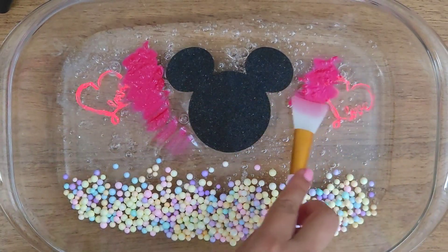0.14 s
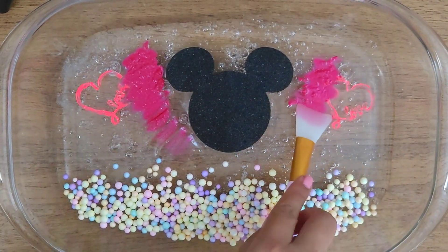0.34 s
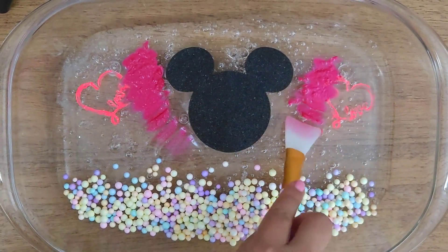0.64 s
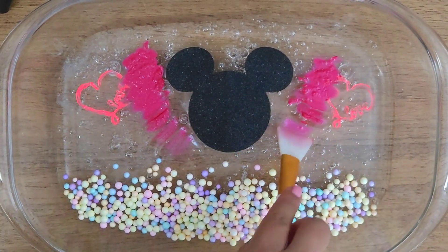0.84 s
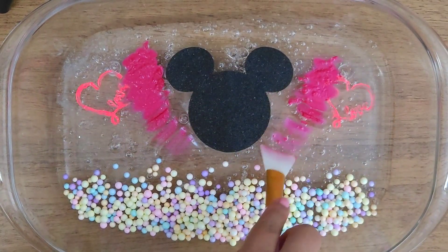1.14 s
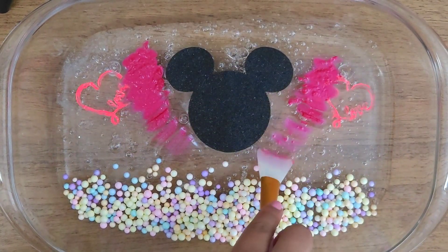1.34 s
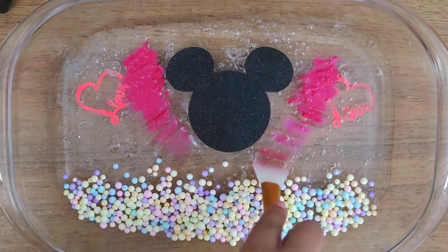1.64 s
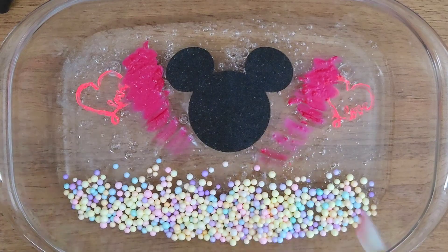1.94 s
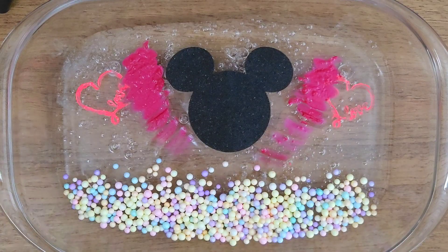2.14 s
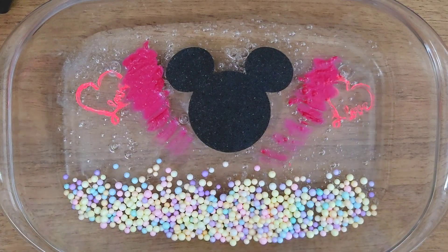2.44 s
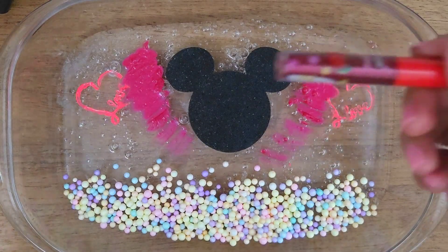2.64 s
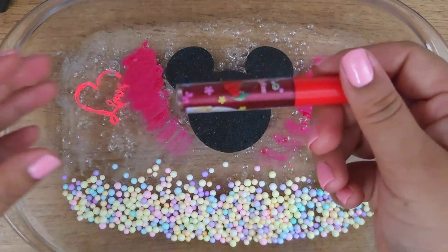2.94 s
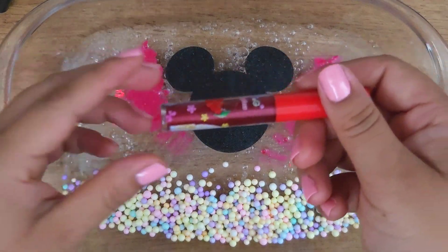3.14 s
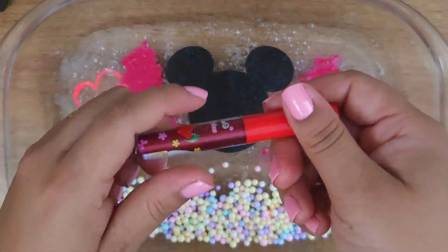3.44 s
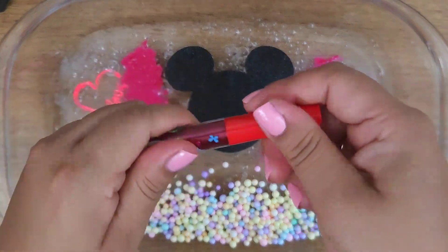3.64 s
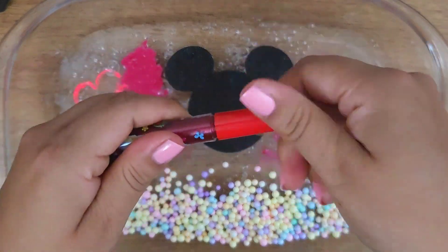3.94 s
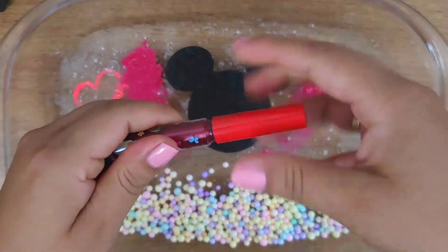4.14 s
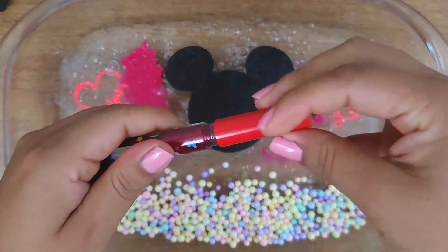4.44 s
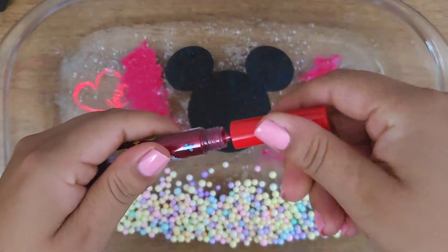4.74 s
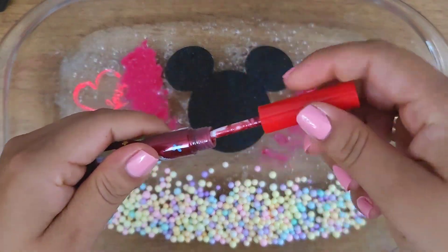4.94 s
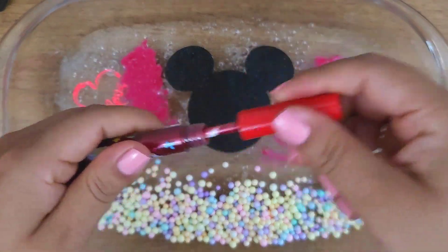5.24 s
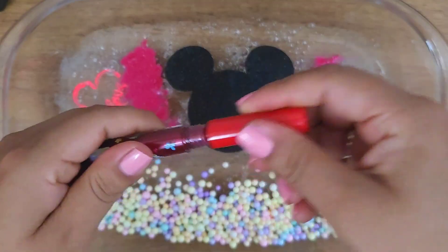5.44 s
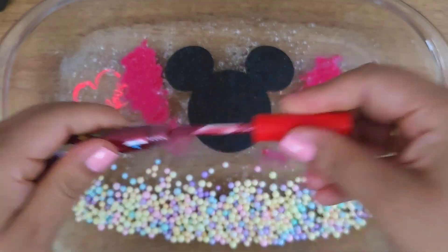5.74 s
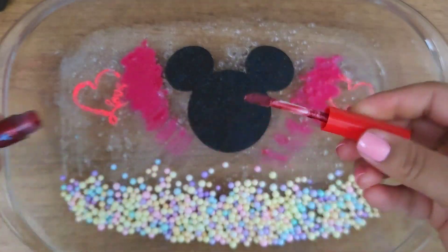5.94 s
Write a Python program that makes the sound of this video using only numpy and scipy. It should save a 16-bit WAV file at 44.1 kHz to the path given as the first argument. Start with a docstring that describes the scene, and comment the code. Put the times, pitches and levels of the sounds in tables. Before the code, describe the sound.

Close, quiet slime peeling and soft low thuds, a brief hand swish, then light plastic ticks growing into loud snappy clacks as a wand slides out.

```python
"""A soft brush dabs sticky slime in a glass dish: filtered crackling noise peels, short pitched bursts snap.
Each dab thumps the table, noise and a knock ringing its modes; then a hand swishes and drags, banded noise.
Close by, fingers twist open a small plastic tube: noise rubs in the thread, short rattles ring the plastic,
brief noisy tones squeak, and the walls answer with decaying noise.
Under it all lies a quiet room: a machine drone, a low swelling rumble and faint air, all shaped noise."""
import sys
import numpy as np
from scipy import signal
from scipy.fft import rfft, irfft, next_fast_len
from scipy.io import wavfile
from scipy.ndimage import map_coordinates

SR = 44100
rng = np.random.default_rng(int(sys.argv[2]) if len(sys.argv) > 2 else 0)


def natural_amplitude(level_db):
    """Convert a level in decibels to a linear amplitude factor, elementwise."""
    exponent = np.asarray(level_db, float) / 20
    return 10 ** exponent


def log_audio(samples):
    """Write samples as a 16-bit WAV file to the path given in sys.argv[1]."""
    # one column per channel
    frames = np.atleast_2d(samples).T
    # limit to full scale, then quantise
    limited = np.clip(frames, -1, 1)
    pcm = np.round(limited * 32767).astype(np.int16)
    wavfile.write(sys.argv[1], SR, pcm)


N = 268613
LEFT_RIGHT = np.array([[1], [-1]])  # opposite signs for the two channels


def unit(x):
    """Scale to rms 1."""
    return x / np.sqrt(np.mean(x ** 2) + 1e-20)


def along(points, hz):
    """Read (Hz, value) points on a log frequency axis."""
    f, value = np.transpose(points)
    return np.interp(np.log(hz + 1), np.log(f + 1), value)


def curves(rows):
    """One value per sample for each column after the time."""
    s, *columns = np.transpose(rows)
    return [np.interp(np.arange(N) / SR, s, column) for column in columns]


def stroke_db(full_s, db, rise_s, hold_s, fade_db_per_s=900):
    """Level of one stroke: climbs 25.5 dB over its rise, holds, then fades."""
    t = np.arange(N) / SR - full_s
    return db - 25.5 * np.maximum(-t, 0) / rise_s - fade_db_per_s * np.maximum(t - hold_s, 0)


def strokes(rows):
    """Gains of the main band and of the fine hiss above it, summed over all strokes."""
    main = natural_amplitude([stroke_db(*row[:4]) for row in rows])
    return main.sum(0), natural_amplitude([row[-1] for row in rows]) @ main


def wobble(rate):
    """A smooth random curve, rate knots a second."""
    return map_coordinates(rng.standard_normal(N // 8), [np.arange(N) * rate / SR])


def crackle(spiky_db):
    """Noise whose size jumps from one millisecond to the next."""
    return rng.standard_normal(N) * natural_amplitude(spiky_db * wobble(700))


def filtered(x, response):
    """Multiply the spectrum of x by a complex response of frequency."""
    m = next_fast_len(x.shape[-1] + 8192)
    return irfft(rfft(x, m) * response(np.fft.rfftfreq(m, 1 / SR)), m)[..., :x.shape[-1]]


def resonances(modes, f):
    """Causal sum of (Hz, width Hz, dB) resonances of alternating sign."""
    total = 0
    for k, (center, width, db) in enumerate(modes):
        damping = 1j * f * width
        total = total + (-1) ** k * natural_amplitude(db) * damping / (center * center - f * f + damping)
    return total


def rush(spectrum, alike):
    """Stereo noise of rms 1, with a spectrum and a left-right likeness over frequency."""
    def response(hz):
        turn = np.arccos(np.clip(along(alike, hz), 0, 1)) / 2
        return natural_amplitude(along(spectrum, hz)) * [np.cos(turn), np.sin(turn)]

    mid, side = filtered(rng.standard_normal((2, N)), response)
    return unit(np.array([mid + side, mid - side]))


def add(out, s, db, shape):
    """Mix in a short sound at a time and peak level, taken on its first row."""
    start = round(s * SR)
    peak = np.abs(np.atleast_2d(shape)[0]).max()
    out[..., start:start + shape.shape[-1]] += natural_amplitude(db) * shape / peak


# swells of the rumble: time_s, level_db
RUMBLE_SWELLS = [(0.0, -50.5), (0.12, -62.5), (0.29, -52.5), (0.63, -63), (0.83, -57.5), (1.97, -57),
                 (2.15, -61.5), (2.42, -60.5), (2.53, -70.5), (2.73, -65), (2.88, -58.5), (3.14, -60.5),
                 (3.48, -61.5), (3.73, -63), (4.07, -60), (4.31, -62), (4.55, -59.5), (5.3, -57.5),
                 (6.09, -60.5)]
# color of the rumble: pitch_hz, relative density_db per Hz
RUMBLE_COLOR = [(8, -23), (20, -4.5), (30, -4.5), (45, -4), (60, 4), (108, -6), (139, -7), (200, -15.5),
                (240, -36), (500, -76)]
# color of the air: pitch_hz, relative density_db per Hz
AIR_COLOR = [(120, -29), (200, -8), (240, -5.5), (529, -9.5), (612, -17.5), (696, -15.5), (950, -20),
             (1180, -15.5), (2420, -30), (2800, -28), (3070, -31), (6280, -42), (7270, -37), (14600, -47.5),
             (16000, -49)]
# likeness of left and right: pitch_hz, likeness (below 0 counts as 0, 1 is identical)
LIKENESS = [(60, 1), (180, 0.4), (550, 0.37), (1650, -0.12), (4970, 0), (15000, 0.5)]
# machine drone modes, run through twice: pitch_hz, width_hz, level_db of one pass
DRONE_MODES = [(55.43, 7, -3.5), (89.36, 7.1, -4.5), (118.8, 2.2, -1.5), (145, 12, -11.5), (182, 2.1, -9)]


def room_tone():
    """Far machinery: a wavering drone over swelling rumble, and air that follows the swells a little."""
    rumble_db, = curves(RUMBLE_SWELLS)
    swell_db = rumble_db - rumble_db.mean()
    drone = unit(filtered(rng.standard_normal(N), lambda f: resonances(DRONE_MODES, f) ** 2))
    drone = natural_amplitude(-55 + 0.5 * swell_db) * drone
    rumble = natural_amplitude(rumble_db + 1.8 * wobble(7.7)) * rush(RUMBLE_COLOR, LIKENESS)
    air = natural_amplitude(-69 + 0.45 * swell_db + 0.64 * wobble(16.0)) * rush(AIR_COLOR, LIKENESS)
    return drone + rumble + air


# bristles peeling off the slime: full_s, level_db, rise_s, hold_s, fizz_db over the level
PEELS = [(0.044, -89, 0.017, .002, 5), (0.222, -63, 0.0069, 0.037, -6), (0.28, -63.5, .04, 0.0098, -17.5),
         (0.31, -80, .04, .02, -9), (0.454, -80, .024, .004, -16), (0.542, -78.5, 0.097, 0.0035, -5),
         (0.888, -72, 0.023, 0.0015, 4.5), (1.132, -64.5, 0.025, 0.0014, 2.5),
         (1.408, -69.5, .03, 0.019, -6), (1.548, -82, 0.043, .002, 10.5), (1.734, -77, 0.16, 0.0085, -2)]
# modes of the wet film: pitch_hz, width_hz, relative level_db
FILM_MODES = [(2400, 930, -16.5), (4000, 910, -10.5), (5270, 250, 1), (7200, 950, -9)]
# sticky snaps of the film: start_s, peak_db of ring and of tick, pitch_hz
SNAPS = [(0.04, -66.5, 2060), (0.038, -65, 13500), (0.233, -63.5, 1076), (0.275, -67, 1100),
         (0.447, -63, 1100), (0.45, -68.5, 6600), (0.532, -71, 3380), (0.811, -63.5, 1003),
         (0.862, -64, 1080), (0.855, -68, 8400), (0.886, -63, 1100), (0.888, -67.5, 2400),
         (0.887, -57.5, 10500), (1.128, -60.5, 6100), (1.194, -60.5, 10500), (1.339, -71, 3200),
         (1.412, -70, 2040), (1.467, -73, 3600), (1.545, -64.5, 11000), (1.757, -72.5, 3630)]


def brush():
    """The film tears in dense tiny grains and now and then snaps at one pitch, with a broad tick."""
    film, fizz = strokes(PEELS)
    grains = natural_amplitude(2.0 * wobble(200)) * crackle(spiky_db=1.5)
    wet = unit(filtered(grains, lambda f: resonances(FILM_MODES, f)))
    fine_grains = crackle(spiky_db=3)
    fine = unit(filtered(fine_grains, lambda f: resonances([(12800, 6700, 0)], f) ** 2))
    out = np.pad(film * wet + fizz * fine, (0, SR))
    t = np.arange(SR // 20) / SR
    for s, db, hz in SNAPS:
        burst = rng.standard_normal(len(t)) * natural_amplitude(-60 * t / 0.035)
        ring = filtered(burst, lambda f: resonances([(hz, 0.069 * hz, 0)], f) ** 2)
        tick = filtered(burst * natural_amplitude(-60 * t / 0.022), lambda f: resonances([(7000, 9000, 0)], f))
        add(out, s, db, ring)
        add(out, s, db, tick)
    return out[:N]


# pushes on the table: start_s, thump peak_db, firmness_db per octave, knock drive_db
PUSHES = [(0.078, -48, 6.5, 23.5), (0.261, -36.5, 3.5, 26.5), (0.345, -41, -14, 24), (0.437, -48, -6, 23),
          (0.881, -39, 1, 22), (1.052, -35.5, 5.5, 26.5), (1.184, -35.5, -2, 24), (1.322, -34.5, 3.3, 28),
          (1.459, -35.5, 1, 28.5), (1.565, -34.5, 2.7, 26), (1.746, -36, 0.5, 22.5), (3.85, -53, -4, 29),
          (5.358, -40.5, 9, 31), (5.46, -52.5, 4, 19), (5.678, -40, 8.5, 31), (5.836, -35, 5, 36)]
# table top modes: pitch_hz, width_hz, level_db before the firmness tilt
TABLE_MODES = [(70, 7.4, 1), (87, 12, 2), (124.6, 17, 2.5), (157, 28.8, -3), (192, 14, -3),
               (321, 29, -11.5), (556, 510, -21.5), (800, 190, -15.5), (1100, 300, -29)]
# the slime-filled dish: pitch_hz, width_hz, relative level_db
DISH_MODES = [(650, 320, 2.5), (1150, 270, 1.5), (2600, 540, -15)]


def table():
    """Each soft push knocks the table top and shakes it while the hand stays down; a firmer one favors
    higher modes and the dish."""
    press_s, slap_db, dish_db = 0.06, -13.5, -27
    out, t = np.zeros(N + SR), np.arange(SR // 2) / SR
    for s, db, firm_db, knock_db in PUSHES:
        knock = natural_amplitude(knock_db) * np.exp(-((t - .004) / 0.0012) ** 2)
        tremble = rng.standard_normal(len(t)) / (1 + (t / press_s) ** 8)
        tremble = natural_amplitude(32) * filtered(tremble, lambda f: 1 / (1 + 1j * f / 330) ** 4)
        # the soft contact lands bit by bit
        slap = natural_amplitude(knock_db + slap_db) * rng.standard_normal(len(t)) * t / 0.01 * np.exp(-t / 0.011)
        modes = [(hz, width, mode_db + firm_db * np.log2(hz)) for hz, width, mode_db in TABLE_MODES]
        # the soft contact also dulls the top
        thump = filtered(knock + slap + tremble, lambda f: resonances(modes, f) / (1 + 1j * f / 1300) ** 2)
        dish = filtered(slap, lambda f: resonances(DISH_MODES, f))
        add(out, s, db, thump)
        add(out, s + .004, db + dish_db + 0.71 * firm_db, dish)
    return out[:N]


# a hand moving off over the table: full_s, level_db, rise_s, hold_s
SWISHES = [(2.14, -68, 0.11, 0.0078), (2.29, -63.5, 0.19, 0.048), (2.4, -68, 0.16, 0.041)]
# modes of the swish: pitch_hz, width_hz, relative level_db
SLEEVE_MODES = [(316, 23, 5), (512, 46, -2.5), (712, 61, -7)]
# the sleeve drags on the table: full_s, level_db, rise_s, hold_s
DRAGS = [(2.392, -57.5, 0.14, 0.05)]


def hand():
    """The moving hand and sleeve swish softly and low; a short drag stirs one table mode."""
    moves = sum(natural_amplitude(stroke_db(*row, fade_db_per_s=400)) for row in SWISHES)
    drags = sum(natural_amplitude(stroke_db(*row, fade_db_per_s=400)) for row in DRAGS)
    noise = rng.standard_normal((2, N)) + rng.standard_normal(N)  # half shared by left and right
    swish = unit(filtered(noise, lambda f: resonances(SLEEVE_MODES, f)))
    drag = unit(filtered(rng.standard_normal(N), lambda f: resonances([(189, 20.5, 0)], f) ** 2))
    return moves * swish + drags * drag


# fingers turning the cap and sliding the wand: full_s, level_db, rise_s, hold_s, skin hiss_db over the level
TWISTS = [(3.845, -63.5, 0.042, 0.0042, 0), (4.17, -72, 0.081, 0.0012, 0.5), (4.408, -81, 0.061, 0.06, 3.5),
          (4.574, -72.5, 0.016, 0.0036, -1)]
# tube contacts: start_s, peak_db at the spot struck, spot (0 barrel, 1 wall, 2 neck, 3 stem),
# loss_db per part away from the spot (its sign is ignored), edge_db over the peak
CLICKS = [(3.67, -57, .7, 10, -7.5), (3.844, -52.5, 0.66, 3, 1.5), (3.95, -68.5, .05, 12, -19),
          (4.162, -51, 1.05, 4, -1.5), (4.34, -59, 0.05, 30, -19), (4.578, -43.5, 0.11, 21, -26),
          (4.889, -82, 0.1, 9, 10), (4.981, -53.5, 0.045, 28, -5), (5.032, -47.5, 3.6, 4, -13.5),
          (5.042, -57.5, 2.2, -17, 7.5), (5.062, -48.5, 3.7, 1, 1.8), (5.069, -56, 2.7, 8, -6.5),
          (5.133, -51, 2.95, 35, 2.5), (5.161, -48.5, 2.95, 10, -6.5), (5.198, -39.5, 2.1, 2.5, -2.5),
          (5.218, -33.5, 2, 4.5, -5.5), (5.226, -34.5, .6, 1, -16.5), (5.231, -33, 1.8, 12, -4),
          (5.337, -41, .4, -0.5, 2), (5.341, -39.5, 2.05, 4.5, -9.5), (5.368, -28.5, 0.05, 0, -12.5),
          (5.372, -37.5, 0.1, 8.5, 6.5), (5.385, -41, 2.9, 5.5, -10.5), (5.422, -46, 0.05, 6.5, 5.5),
          (5.4486, -23, 1.1, 0.6, -7.5), (5.4526, -9.5, 0.75, 10, -10), (5.638, -46, 0.15, 4, 4),
          (5.6688, -27, 0.092, 5, -9.5), (5.6753, -17, 2.44, 5.5, -3), (5.6761, -11.5, 1.76, 4, -3),
          (5.8389, -27, 0.1, 0.8, -0.5)]
# modes of the plastic: pitch_hz, width_hz, relative level_db
TUBE_MODES = [(1037, 500, -11), (1640, 93, -5.5), (2261, 290, 5.5), (3200, 980, 3.5), (4230, 560, 0),
              (4665, 740, -3.5), (5000, 550, -5.5), (6210, 850, -4.5), (10500, 540, -4.5),
              (11350, 4200, -13.5), (13370, 410, -18.5), (13850, 350, -18.5)]
# bands of barrel, wall, neck, stem, edge: low_hz, high_hz
ZONES = [(600, 2550), (2550, 4300), (4300, 5900), (5900, 8500), (9500, 16000)]


def tube():
    """Skin and thread rub in hissing bands; each contact is a short rattle through the plastic's modes.
    Returns what both ends of the tube send alike, what they send differently, and two feeds to the room,
    since the walls answer neighboring contacts differently."""
    def low():
        bands = [(3200, 860, 0.71), (7000, 1700, 0.42)]
        return unit(filtered(crackle(spiky_db=-3.5), lambda f: resonances(bands, f)))

    def high():
        bands = [(10700, 2600, 0.3), (13500, 3000, -1.0)]
        return unit(filtered(crackle(spiky_db=7.5), lambda f: resonances(bands, f) ** 2))

    rub, hiss = strokes(TWISTS)
    out = np.pad([rub * low() + hiss * high() for _ in range(4)], ((0, 0), (0, SR)))
    t = np.arange(SR // 20) / SR
    for k, (s, peak_db, spot, loss_db, edge_db) in enumerate(CLICKS):
        parts_away = np.arange(len(ZONES) - 1) - spot
        zones_db = peak_db + np.append(-np.abs(loss_db * parts_away), edge_db)
        rattle = rng.standard_normal((2, len(t))) * t ** 2 * np.exp(-t / 0.00092)
        # one hard hit 2 ms in
        blow = np.linalg.norm(rattle[0]) * (t == t[90])
        # the hit is the same from both ends
        ends = rattle + natural_amplitude(-6) * blow * [[1], [0]]
        # summed over all directions the rattle has no gaps in its spectrum: the room gets the bare hit
        feeds = np.vstack([ends, blow * (k % 2), blow * (1 - k % 2)])
        # where the blow lands sets which modes speak
        for (low_hz, high_hz), db in zip(ZONES, zones_db):
            band = [(np.sqrt(low_hz * high_hz), high_hz - low_hz, 0)]
            add(out, s, db, filtered(feeds, lambda f: resonances(TUBE_MODES, f) * resonances(band, f) ** 2))
    return out[:, :N]


# squeaks of the thread and of the wand in the wet neck: start_s, peak_db, pitch_hz, length_s
SQUEAKS = [(3.839, -64, 3050, 0.015), (3.844, -64, 1686, 0.008), (4.161, -61, 3050, 0.0091),
           (4.581, -51, 3030, 0.0027), (5.23, -34.5, 4830, .006), (5.242, -45, 4800, 0.005)]


def squeaks():
    """Short slips that hold one pitch roughly: a sine with some noise through one resonance."""
    out, t = np.zeros(N + SR), np.arange(SR // 20) / SR
    for s, db, hz, length in SQUEAKS:
        slip = np.sin(2 * np.pi * hz * t) + .3 * rng.standard_normal(len(t))
        slip = slip / (1 + (t / length) ** 6)
        add(out, s, db, filtered(slip, lambda f: resonances([(hz, 0.17 * hz, 0)], f)))
    return out[:N]


# how long the room rings: pitch_hz, t60_s
WALL_DECAY = [(200, 0.16), (1000, 0.19), (3500, 0.29), (7000, 0.27), (14000, 0.26)]


def walls(x):
    """Each frequency of the room's answer dies at its own speed."""
    hz, t, z = signal.stft(rng.standard_normal((2, SR // 2)), SR, nperseg=256)
    decay = natural_amplitude(-60 * t / along(WALL_DECAY, hz)[:, None])
    tail = signal.istft(z * decay, SR, nperseg=256)[1]
    late = np.pad(x, (130, 0))[None]  # samples on the way to the walls
    return signal.fftconvolve(late, tail / np.linalg.norm(tail[0]), axes=1)[:, :N]


def spaced(x, lag_s):
    """Two microphones a little apart hear a near source at different times."""
    return filtered(x, lambda f: np.exp(-1j * np.pi * f * lag_s * LEFT_RIGHT))


def scene():
    """Near sources, their room echo, the table, the hand and the room tone."""
    film, (alike, apart, odd, even), squeak = brush(), tube(), squeaks()
    plastic = alike + squeak + natural_amplitude(1.0) * apart * LEFT_RIGHT
    plastic = plastic * natural_amplitude(0.8 * LEFT_RIGHT)  # held a little to the left
    near = spaced(film, lag_s=.00003) + plastic
    film_echo = natural_amplitude(-8.0) * walls(film)
    plastic_echo = natural_amplitude(-4) * (walls(odd + natural_amplitude(-5) * squeak) + walls(even))
    return near + film_echo + plastic_echo + table() + hand() + room_tone()


def top_cut(x):
    """Nothing passes above the cut-off."""
    return signal.sosfilt(signal.butter(12, 16480, fs=SR, output="sos"), x)


# microphone port: pitch_hz, gain_db
PORT_DIP = [(6500, 0), (9000, -3), (11000, -1.5)]


def record(dry):
    """A slightly unbalanced microphone pair whose ports dip the treble, with a band limit."""
    lean_db, top_hz = 1.52, 15850  # the left microphone is hotter, the right one as much quieter
    pair = filtered(dry * natural_amplitude(lean_db * LEFT_RIGHT), lambda f: natural_amplitude(along(PORT_DIP, f)) * (f < top_hz))
    return top_cut(pair)


dry = scene()
out = record(dry)
log_audio(out)
```